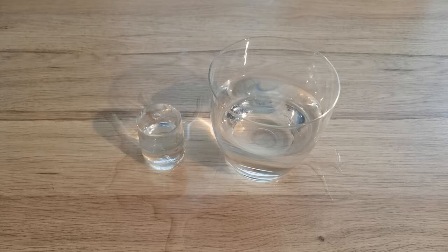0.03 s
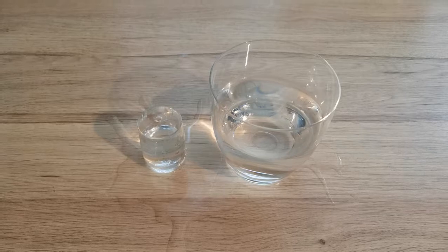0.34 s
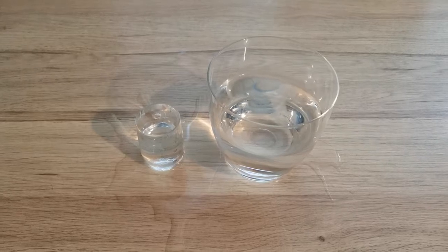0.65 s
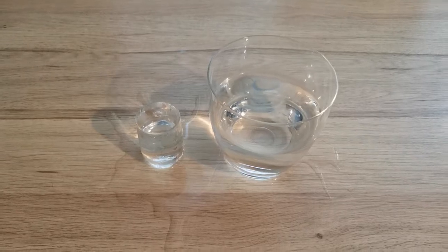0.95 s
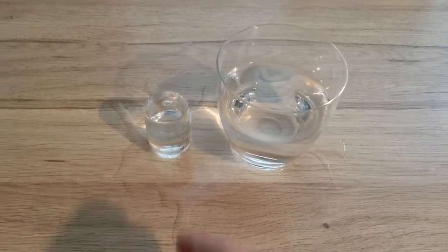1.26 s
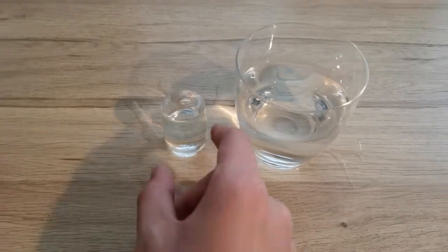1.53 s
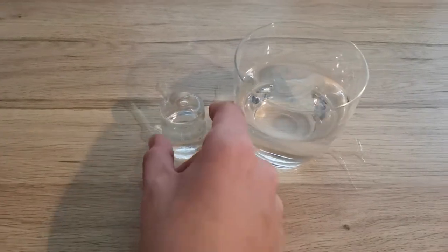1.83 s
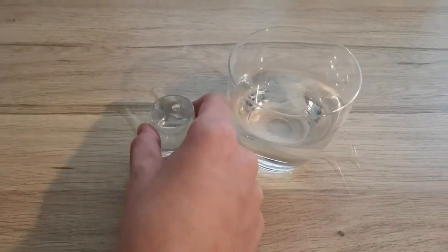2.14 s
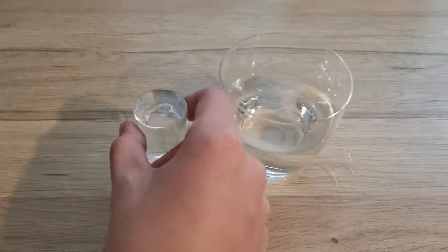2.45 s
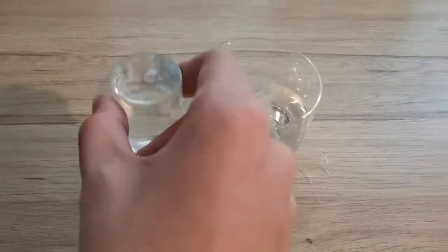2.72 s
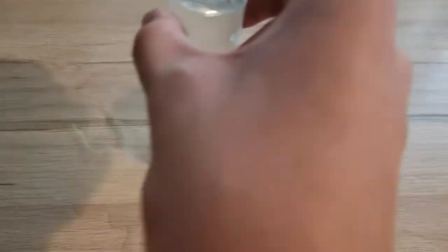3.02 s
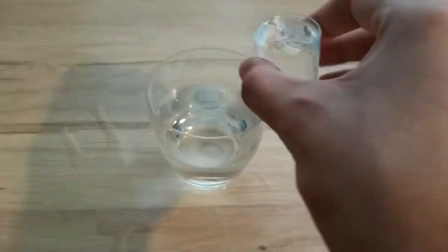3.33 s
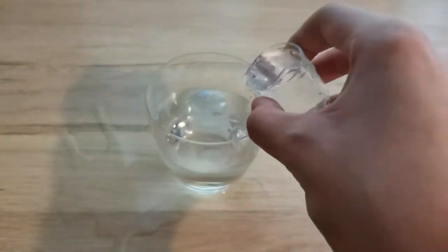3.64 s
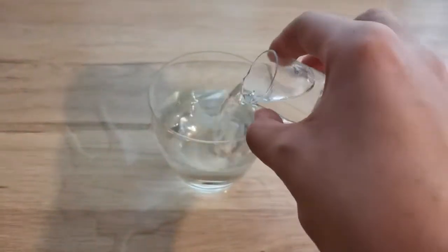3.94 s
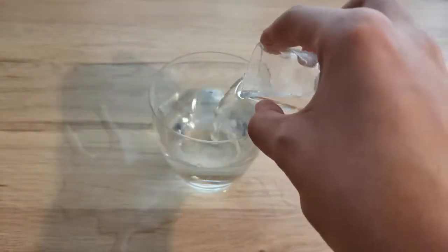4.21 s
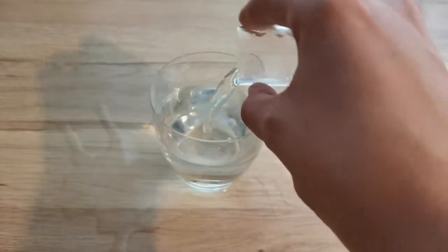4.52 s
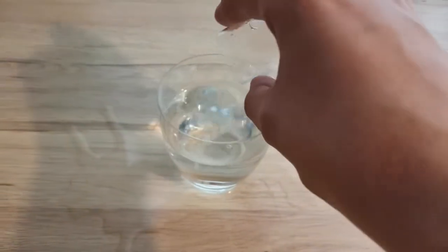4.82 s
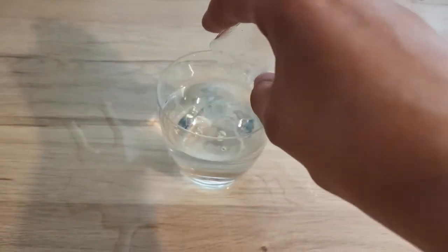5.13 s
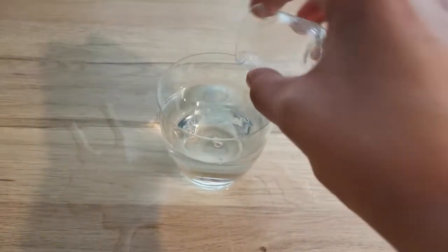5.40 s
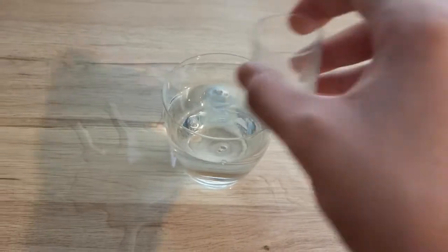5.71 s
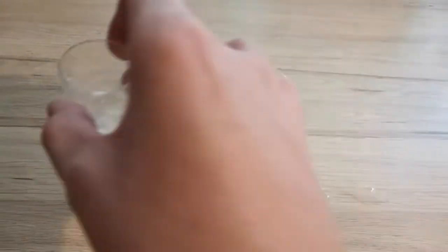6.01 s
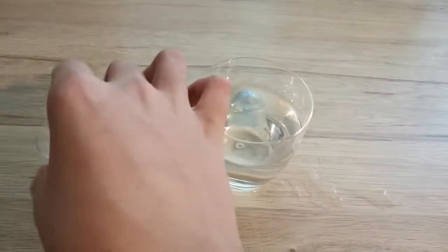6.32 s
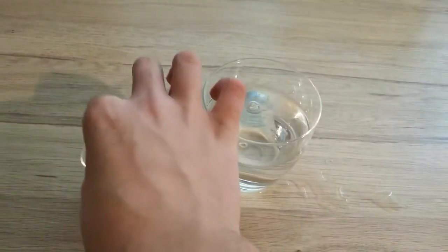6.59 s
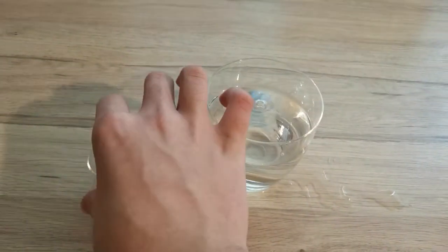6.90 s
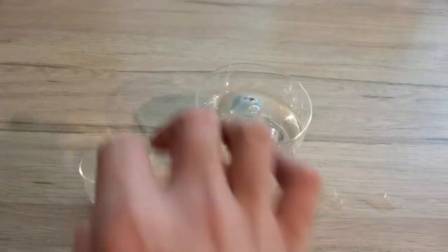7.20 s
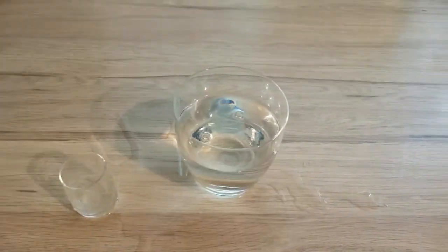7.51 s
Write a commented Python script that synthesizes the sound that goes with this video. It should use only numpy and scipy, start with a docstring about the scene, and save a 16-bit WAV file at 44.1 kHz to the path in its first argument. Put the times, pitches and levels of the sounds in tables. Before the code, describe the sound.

Close to a phone microphone, a small glass bumps and scrapes softly as it comes off a wooden table. After a pause, water is tipped into a bigger glass in a quick bubbling trickle, with light ringing clinks of rim on rim. Some drips follow. Last and loudest, the emptied glass knocks down, making the table top ring briefly. Behind it all are a quiet room's air, a soft hum and a few barely audible thin squeaks.

```python
"""A shot glass emptied into a larger glass, close to a phone microphone in a small quiet room.
It thuds and scrapes as it leaves the wooden table, then the rims clink and ring over a short pour.
Drops click on the water and trap ringing bubbles, a few late ones plop in, and the empty glass is
knocked down, setting the table top ringing. Faint thin squeaks waver over the room's air and hum."""
import sys
import numpy as np
from scipy import signal
from scipy.fft import rfft, irfft
from scipy.io import wavfile
from scipy.ndimage import uniform_filter1d

SR = 44100
rng = np.random.default_rng(int(sys.argv[2]) if len(sys.argv) > 2 else 0)


def wrap_up_sound(samples):
    """Save the sound to the file named by the first command line argument, as 16-bit audio."""
    columns = np.atleast_2d(samples).T
    # keep every value between -1 and 1, then stretch to whole-number steps
    tamed = np.clip(columns, -1, 1)
    steps = np.round(tamed * 32767).astype(np.int16)
    wavfile.write(sys.argv[1], SR, steps)


N = 341775
T = np.arange(N) / SR
RING = T[:int(1.2 * SR)]  # seconds since a hit
SIDE = np.array([[1], [-1]])  # left plus, right minus


def undb(db):
    """Decibels to gain."""
    return 10 ** (np.asarray(db) / 20)


def unit(x):
    """Scale to rms 1."""
    return x / np.sqrt(np.mean(x ** 2))


def fade(t60):
    """Exponential decay, 60 dB down after t60 seconds."""
    return np.exp(-np.log(1000) * RING / t60)


def pan(db):
    """Stereo gains for a left minus right level."""
    return undb(SIDE * db / 2)


def add(out, start, x):
    """Mix x into out from start seconds on."""
    i = int(start * SR)
    out[:, i:i + x.shape[-1]] += x[..., :N - i]


def along(points, hz):
    """Read (Hz, value) points on a log-frequency axis."""
    f, value = np.transpose(points)
    return np.interp(np.log(np.maximum(hz, 1)), np.log(f), value)


def colour(x, points):
    """Filter x by a curve of (Hz, dB) points."""
    n = x.shape[-1]
    return irfft(rfft(x) * undb(along(points, np.fft.rfftfreq(n, 1 / SR))), n)


def band(x, lo_hz, hi_hz, order=2):
    """Causal band-pass."""
    return signal.sosfilt(signal.butter(order, [lo_hz, hi_hz], "band", fs=SR, output="sos"), x)


def wander(n, size):
    """Random drift of rms 1, smoothed over size samples."""
    return unit(uniform_filter1d(rng.standard_normal(n), size=size))


def diffuse(n, wide_hz):
    """Noise from all around the microphone: alike on both sides in the bass, unrelated above wide_hz."""
    mid, side = rfft(rng.standard_normal((2, n)))
    alike = 1 / (1 + (np.fft.rfftfreq(n, 1 / SR) / wide_hz) ** 4)
    return irfft(mid * np.sqrt((1 + alike) / 2) + side * np.sqrt((1 - alike) / 2) * SIDE, n)


def ping(hz, length, rise=0., attack=0.13, steep=0.86):
    """A short tone that swells and is choked off; with rise, its pitch climbs towards the end."""
    age = np.minimum(RING / length, 10)
    pitch = hz * (1 + rise * np.minimum(age, 2) ** 2)
    envelope = (1 - np.exp(-age / attack)) * np.exp(-age ** steep)
    return envelope * np.sin(2 * np.pi * np.cumsum(pitch) / SR)


def tick(hz, t60, spread=1.05):
    """A decaying burst of noise around hz; spread widens its band."""
    noise = band(rng.standard_normal((2, len(RING))), hz / spread, hz * spread, order=1)
    return unit(noise) * fade(t60) / 2


# Room tone at the microphone. Each row: frequency in Hz, relative level in dB.
AIR_COLOUR = [(15, -41), (25, -0.5), (101, -2.5), (169, -4.5), (198, -2.5), (227, -5.5), (297, -6),
              (368, -9.5), (552, -12), (598, -15.5), (648, -12), (2700, -21.5), (4380, -20.5),
              (5880, -29.5), (15500, -40)]
# Its stereo width. Each row: frequency in Hz, side minus mid in dB.
AIR_WIDTH = [(60, -1.5), (110, -1), (200, -2), (380, -0.5), (700, -1), (1290, -0.5), (2380, 0.5),
             (4400, 0.5), (8120, 0), (15000, 1.5)]
# Electrical hum. Each row: frequency in Hz, level in dB.
HUM_TONES = [(100, -81), (199.5, -75), (300.5, -77), (602, -82), (3058, -88)]

def room_tone(air_db=-64.5):
    """Steady room air, wide in the treble, with a soft electrical hum."""
    mid, side = (unit(colour(rng.standard_normal(N), AIR_COLOUR)) for _ in range(2))
    air = undb(air_db) * (mid + colour(side, AIR_WIDTH) * SIDE)
    drifts = np.cumsum(rng.standard_normal((len(HUM_TONES), N)), axis=1) * 0.018
    return air + sum(np.sqrt(2) * undb(db) * np.sin(2 * np.pi * hz * T + drift)
                     for (hz, db), drift in zip(HUM_TONES, drifts))


# Fingers take the glass and tip it. Each row: start in seconds, level in dB, length in seconds.
GRIP_THUDS = [(1.9010, -48.5, 0.026), (1.9580, -26.5, 0.0086), (1.983, -33, 0.004), (2.036, -44, 0.0037)]
# Glass scraping on wood. Each row: frequency in Hz, relative level in dB.
SCRAPE_COLOUR = [(200, -13), (420, -2), (600, -1.5), (810, 0.5), (1050, -6), (1500, -19.5), (2300, -18.5),
                 (5000, -27), (12000, -57)]
SLIDE_START_S, SLIDE_ATTACK_S, SLIDE_HOLD_S, SLIDE_RELEASE_S = 2.12, 0.025, 0.068, 0.017
SLIDE_DB, SLIDE_SWELL_DB_PER_S = -58.5, 54
JUDDER_HZ, JUDDER_RISE_HZ_PER_S = 750, 995

def pick_up():
    """The gripped glass thuds; its base breaks loose, judders ever faster over the grain and lifts."""
    out = np.zeros((2, N))
    for start, db, length in GRIP_THUDS:
        add(out, start, undb(db) * ping(hz=325, length=length, attack=0.19, steep=1.75))
    age = np.maximum(T - SLIDE_START_S, 0)
    pushed = np.minimum(age, SLIDE_ATTACK_S + SLIDE_HOLD_S)
    envelope = np.minimum(age / SLIDE_ATTACK_S, 1) * np.exp((pushed - age) / SLIDE_RELEASE_S)
    level = envelope * undb(SLIDE_DB + SLIDE_SWELL_DB_PER_S * pushed)
    scrape = unit(colour(diffuse(N, 1200), SCRAPE_COLOUR))
    # stick and slip repeat unevenly, so the note is rough
    judder_hz = (JUDDER_HZ + JUDDER_RISE_HZ_PER_S * pushed) * (1 + 0.0424 * wander(N, 150))
    judder = np.sin(2 * np.pi * np.cumsum(judder_hz) / SR)
    return out + (undb(-1) * scrape + undb(-4.5) * judder) * level


# The base meets the wood, close by. Each row: start in seconds, level in dB, contact cut-off in Hz,
# low cut in Hz.
BASE_KNOCKS = [(1.9592, -25.5, 900, 200), (6.7608, -0.5, 9000, 95), (6.7694, -13, 9000, 2500),
               (6.7739, -3.5, 1400, 200), (6.9642, -18, 1420, 650)]
# The wood's clatter. Each row: frequency in Hz, relative level in dB.
CLATTER_COLOUR = [(60, -33), (130, -17), (240, -8.5), (380, -4.5), (560, -15), (850, -8), (1300, -6.5),
                  (2300, -5.5), (2900, -20), (4150, -17.5), (5200, -27.5), (6450, -28), (7500, -35),
                  (15000, -54.5)]
# The table top under the glass. Each row: mode in Hz, relative level in dB, t60 in seconds.
TABLE_MODES = [(166, -19, .2), (252.9, -8, 0.43), (380.7, -1, 0.14), (474, -12, .22), (539, -17, .33),
               (613, -10, 0.47), (717, -13, 0.24), (791, 4.5, 0.18), (855, -3, 0.26), (988, -3.5, .23),
               (1216, -10.5, .2), (1374, -4.5, .19), (1453, 0, .2), (1650, -1, 0.35), (1694, -9, .17),
               (1802, 4, 0.21), (2070, -13.5, 0.22), (2150, 0, .26), (2255, -4, 0.24), (2527, 0, 0.18),
               (3590, -15, 0.18), (4300, -15, .18), (4660, -17, .2), (6422, -32, 0.14)]

def knocks():
    """The base strikes the board; returns the blows and, apart from them, the table's ringing."""
    blows, rings = np.zeros((2, 2, N))
    swing = undb(-9) * ping(966, 0.0013, attack=0.074, steep=1.8)
    thump = undb(-39) * ping(149, 0.033, attack=0.37, steep=2.2)
    # the thick glass base, damped by the hand
    base_ring = undb(-23.5) * ping(4200, 0.0026) + undb(-26.5) * ping(6450, 0.0014)
    # each mode radiates from its own part of the board; higher ones reach the two sides out of step
    modes = np.zeros((2, len(RING)))
    for k, (hz, db, t60) in enumerate(TABLE_MODES):
        skew = 0.98 * SIDE * min(hz / 1000, 1) ** 2
        modes += undb(db) * fade(t60) * np.sin(2 * np.pi * hz * RING + k * np.pi + skew)
    modes *= 1 - np.exp(-RING / 0.0034)
    for start, db, contact_hz, low_hz in BASE_KNOCKS:
        wood = unit(colour(diffuse(len(RING), 750), CLATTER_COLOUR))
        clatter = undb(-17.5) * wood * fade(0.091) * (1 - np.exp(-RING / 0.0006))
        add(blows, start, undb(db) * band(swing + thump + base_ring + clatter, low_hz, contact_hz))
        add(rings, start, undb(db - 29) * band(modes, low_hz, contact_hz))
    return blows, rings


# Three squeaks, faint at the microphone. Each row: time in seconds, pitch in Hz.
HIGH_GLIDE = [(2.63, 4290), (2.692, 4060), (2.768, 4920), (2.85, 4310), (2.92, 4370)]
SHORT_GLIDE = [(3.11, 3320), (3.218, 3050), (3.304, 3300), (3.33, 3011)]
LONG_GLIDE = [(5.45, 3269), (5.47, 3370), (5.53, 3030), (5.562, 3266), (5.852, 3290), (5.964, 3020),
              (6.0, 3370), (6.04, 2840)]
# Their levels in dB, in that order.
GLIDE_LEVELS = [-73.5, -76.5, -69]

def squeaks(edge_db=-2.5, octave_db=-12):
    """Thin, unsteady tones with a weak octave, each loudest in its middle."""
    out = np.zeros(N)
    for glide, db in zip((HIGH_GLIDE, SHORT_GLIDE, LONG_GLIDE), GLIDE_LEVELS):
        times, hz = np.transpose(glide)
        pitch = uniform_filter1d(np.interp(T, times, hz), size=900) * (1 + 0.006 * wander(N, 600))
        phase = 2 * np.pi * np.cumsum(pitch) / SR
        tone = np.sin(phase) + undb(octave_db) * np.sin(2 * phase)
        gate = uniform_filter1d(1. * (T > times[0]) * (T < times[-1]), size=600)
        arch_db = edge_db * np.interp(T, [times[0], times[-1]], [-1, 1]) ** 2
        flutter_db = 1.5 * wander(N, 600)
        out += gate * undb(db + arch_db + flutter_db) * tone
    return band(out, 2000, 8000, order=6) * np.ones((2, 1))


# Lone droplets on the glass. Each entry: start in seconds.
DROPLET_STARTS = [3.525, 4.042, 4.2355, 5.488, 5.625]
# Drops into the larger glass. Each row: start in seconds, slap level in dB, slap centre in Hz,
# bubble pitch in Hz, bubble level in dB, bubble's left minus right in dB.
WATER_DROPS = [(3.794, -47, 4200, 3090, -42, -4), (3.7968, -47, 4120, 4340, -38.5, 19),
               (3.855, -45, 3640, 4100, -38.5, 6), (3.9576, -62, 2800, 2700, -44.5, 5),
               (3.9820, -28, 3740, 1950, -33, -3), (4.0746, -38, 8450, 8850, -42, -5),
               (4.1068, -39.5, 7000, 4520, -38, 6), (4.2231, -41, 4100, 2870, -38, -1),
               (4.2457, -62, 4000, 2835, -47.5, 10), (4.914, -40, 3330, 1392, -24.5, 0),
               (4.9356, -32.5, 7000, 1443, -27, -1), (4.9486, -36, 5500, 1290, -25.5, -2),
               (4.9592, -49, 5970, 1250, -33, 11), (5.2338, -43, 5900, 4800, -38.5, 9)]

def drops():
    """Each drop slaps the surface and traps a bubble; lone droplets only tick."""
    out = np.zeros((2, N))
    for start, slap_db, slap_hz, bubble_hz, bubble_db, pan_db in WATER_DROPS:
        add(out, start, undb(slap_db) * pan(pan_db + 5) * tick(slap_hz, t60=0.012))
        add(out, start, undb(bubble_db) * pan(pan_db) * bubble(bubble_hz))
    for start in DROPLET_STARTS:
        add(out, start, undb(-55.5) * pan(3) * tick(hz=10700, t60=0.01))
    return out


def bubble(hz, climb_per_s=11):
    """Trapped air rings; a bigger bubble is lower, longer and climbs further as it nears the surface."""
    length = 0.0082 * (1400 / hz) ** 0.58  # seconds
    tone = ping(hz, length, rise=min(climb_per_s * length, .15), attack=0.2, steep=1.7)
    # a weak steady ring outlasts the first swell
    tone += undb(-17.5) * np.sin(2 * np.pi * hz * RING) * (1 - np.exp(-RING / length)) * fade(0.18)
    return np.stack([tone, np.roll(tone, 2)])  # the bowl is nearer the microphone's left side


# The stream's fizz. Each row: frequency in Hz, relative level in dB.
FIZZ_COLOUR = [(1300, -38), (1900, 5), (2400, -2), (2900, 12), (3500, -20), (4200, 2), (5400, -17),
               (6600, 4), (8000, -30), (9300, -8), (11000, -17), (15000, -39)]
# The bowl's air cavity and base answer a drop. Each row: start in seconds, level in dB.
BOWL_PLOPS = [(3.9822, -50), (4.934, -46.5), (4.9599, -45.5)]
# Their resonance. Each row: frequency in Hz, relative level in dB.
BOWL_COLOUR = [(120, -33), (280, -1), (450, -3.5), (750, -21), (1150, -22), (1750, 9), (2050, -10),
               (2600, -12), (6000, -38)]
POUR_START_S, POUR_HOLD_S, POUR_DB, POUR_FALL_DB_PER_S = 3.795, 0.11, -60, 60
SPRAY_START_S, SPRAY_LENGTH_S, SPRAY_DB, SPRAY_HZ, SPRAY_COUNT = 4.055, 0.06, -56, 10600, 14

def stream(grains_per_s=1500):
    """Tiny bubbles crackle in a thin stream that dwindles into spray; heavy drops make the bowl thud."""
    onsets = rng.random(N) < grains_per_s / SR
    grain_db = 2.3 * np.minimum(rng.exponential(size=N), 4)
    grains = onsets * undb(grain_db) * rng.standard_normal((2, N))
    age = T - POUR_START_S
    flow = (age > 0) * undb(POUR_DB - POUR_FALL_DB_PER_S * np.maximum(age - POUR_HOLD_S, 0))
    out = pan(2.6) * unit(colour(grains, FIZZ_COLOUR)) * flow
    for k, (late, pitch, size, side) in enumerate(rng.uniform(-1, 1, (SPRAY_COUNT, 4))):
        start = SPRAY_START_S + SPRAY_LENGTH_S * (k + late / 2) / SPRAY_COUNT
        spatter = undb(SPRAY_DB + 4 * size) * ping(SPRAY_HZ * (1 + 0.3 * pitch), 0.0012)
        add(out, start, pan(-3 + 6 * side) * spatter)
    for start, db in BOWL_PLOPS:
        cavity = unit(colour(diffuse(len(RING), 1500), BOWL_COLOUR))
        add(out, start, undb(db) * cavity * fade(0.15))
    return out


# The two glasses touching, close to the microphone. Each row: mode in Hz, relative level in dB,
# t60 in seconds, left minus right in dB.
GLASS_MODES = [(1704, -23, 0.57, 6), (2129, -21.5, 1.18, 15), (2874, -11.5, 0.36, -4),
               (4310, -11.5, 0.65, 22), (6040, 0, 0.2, 20), (6660, -12, 0.14, 8), (7000, -19, .2, 10),
               (8096, -18, 0.42, -8), (8516, -14, 0.27, -6), (9880, -14.5, 0.39, -18), (9600, -29, .24, 6),
               (11200, -13, .25, 5), (13230, -16, 0.14, 5)]
# Rim against rim. Each row: start in seconds, ring level in dB, contact cut-off in Hz, tick level in dB.
RIM_TOUCHES = [(3.8090, -49.5, 15000, -27), (3.9300, -38.5, 2330, -75), (3.9818, -35, 2370, -47)]

def clinks():
    """A hard touch rings the high modes and a dense shimmer, a soft one mostly the low modes."""
    out = np.zeros((2, N))
    for start, ring_db, contact_hz, tick_db in RIM_TOUCHES:
        # sloshing water loads the wall and bends its pitch slightly
        bent_time = np.cumsum(1 + wander(len(RING), 700) / 800) / SR
        ring = np.zeros((2, len(RING)))
        for hz, db, t60, pan_db in GLASS_MODES:
            gain = undb(db) / (1 + (hz / contact_hz) ** 4)
            ring += gain * pan(pan_db) * fade(t60) * np.sin(2 * np.pi * hz * bent_time)
        crack = ping(6720, 0.0015) + undb(-5) * tick(5600, 0.026, spread=2.2)
        shimmer = undb(-21) * tick(7300, 0.26, spread=1.3)
        contact = pan(8.8) * band(crack + shimmer, 2000, 11500, order=3)
        add(out, start, undb(ring_db) * ring + undb(tick_db) * contact)
    return out


# The small room's decay. Each row: frequency in Hz, t60 in seconds.
ROOM_DECAY = [(150, 0.42), (700, 0.42), (2000, 0.54), (5000, 0.46), (14000, 0.29)]
# Surfaces near the microphone. Each row: left and right delays in seconds, relative level in dB.
NEAR_ECHOES = [(.0078, .0081, -8), (0.0108, .0103, -7.5), (0.0134, .0139, -22), (.0217, .0209, -19),
               (0.0265, 0.04, -27)]

def room(x, tail_db, echo_db, build_s=0.0051):
    """Direct sound, a few echoes off nearby surfaces, then a diffuse tail whose treble dies first."""
    response = np.zeros((2, len(RING)))
    spectrum = rfft(diffuse(len(RING), 600))
    hz = np.fft.rfftfreq(len(RING), 1 / SR)
    octave = np.round(np.log2(np.maximum(hz, 100)))
    for k in np.unique(octave):
        response += irfft(spectrum * (octave == k), len(RING)) * fade(along(ROOM_DECAY, 2 ** k))
    response *= 1 - np.exp(-(RING / build_s) ** 2)
    response = undb(tail_db) * unit(response) / np.sqrt(len(RING))
    for left, right, db in NEAR_ECHOES:
        response[[0, 1], [int(left * SR), int(right * SR)]] += undb(db + echo_db)
    return x + signal.fftconvolve(x, response, axes=1)[:, :N]


def scene():
    """Blows on the wide table drive the room hard; its ringing reaches the microphone mostly direct."""
    blows, rings = knocks()
    in_glass = room(drops() + stream() + clinks(), tail_db=-13.5, echo_db=-4.5)
    on_table = room(blows, tail_db=-6, echo_db=1.5) + room(rings, tail_db=-13.5, echo_db=-16)
    on_table += room(pick_up(), tail_db=-9, echo_db=0)
    return in_glass + on_table + room(squeaks(), tail_db=-5.5, echo_db=-2.5) + room_tone()


def record(dry):
    """The phone's microphone opens after a moment of silence; the top treble is cut steeply."""
    open_s, top_hz = 0.44, 15750
    low_pass = signal.ellip(10, .2, 70, top_hz, fs=SR, output="sos")
    return signal.sosfilt(low_pass, dry * (T > open_s))


dry = scene()
out = record(dry)
wrap_up_sound(out)
```